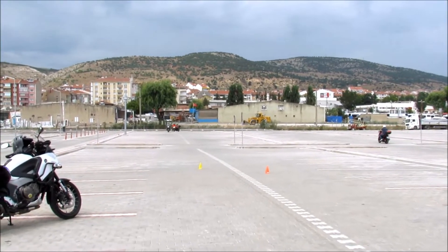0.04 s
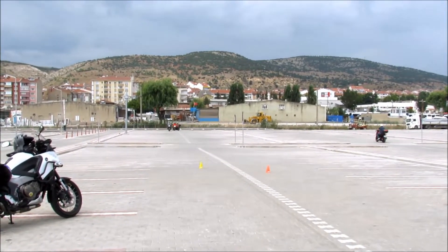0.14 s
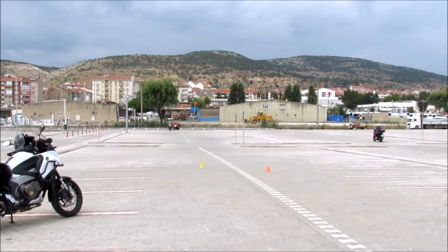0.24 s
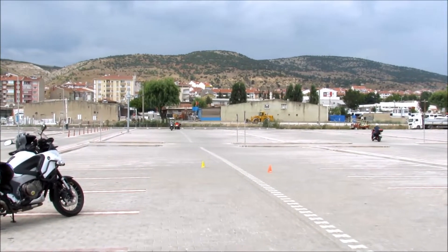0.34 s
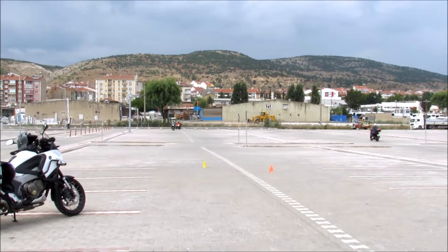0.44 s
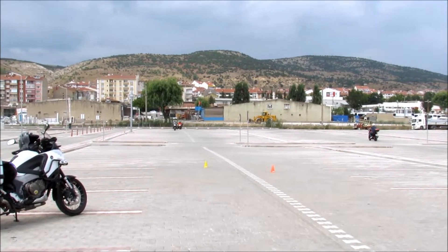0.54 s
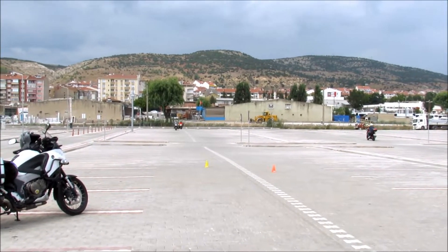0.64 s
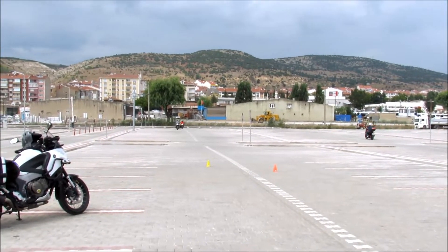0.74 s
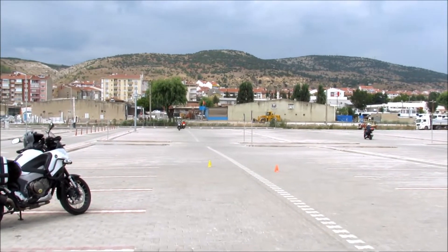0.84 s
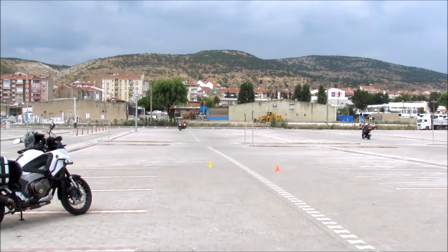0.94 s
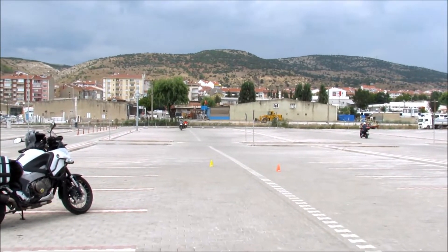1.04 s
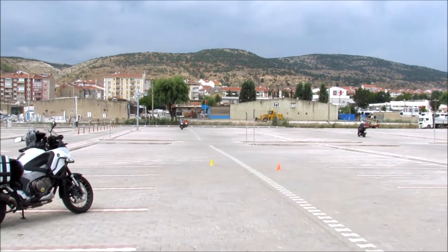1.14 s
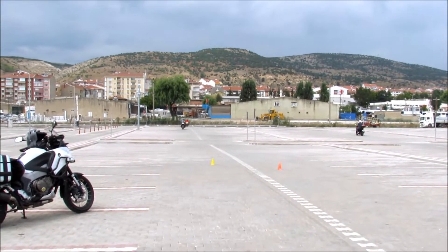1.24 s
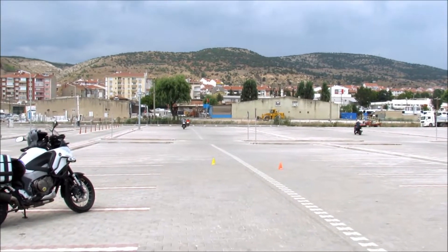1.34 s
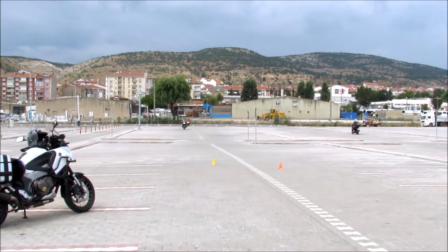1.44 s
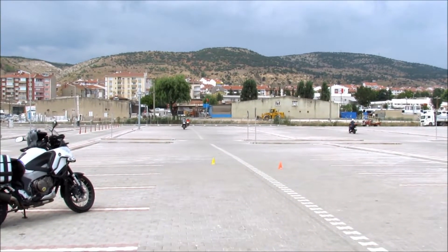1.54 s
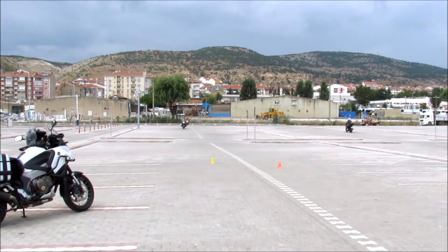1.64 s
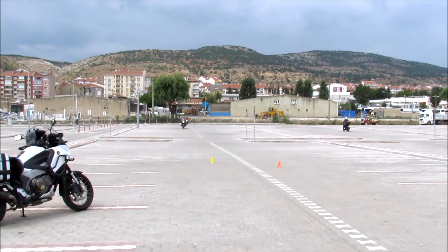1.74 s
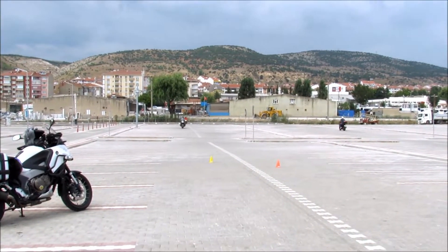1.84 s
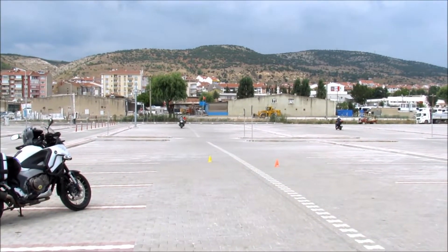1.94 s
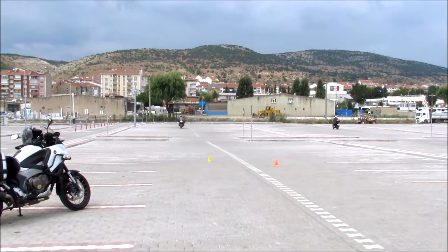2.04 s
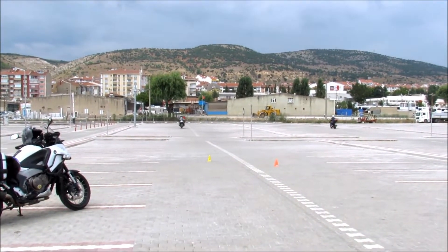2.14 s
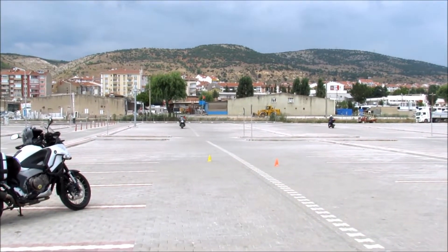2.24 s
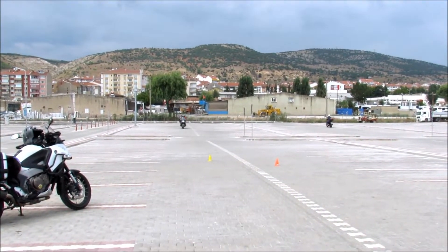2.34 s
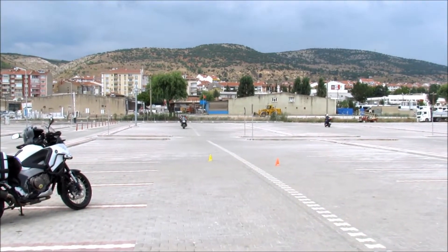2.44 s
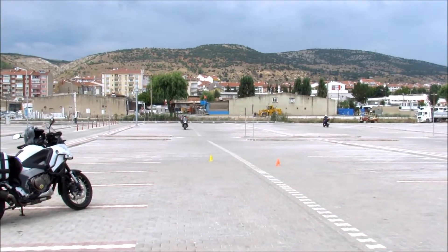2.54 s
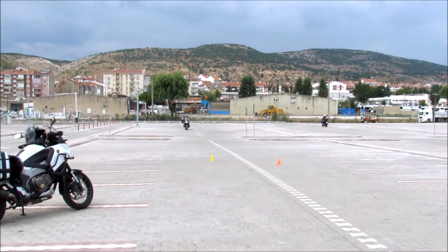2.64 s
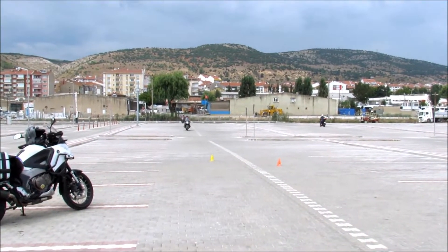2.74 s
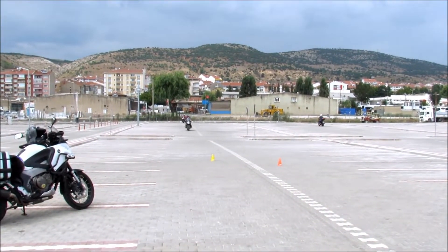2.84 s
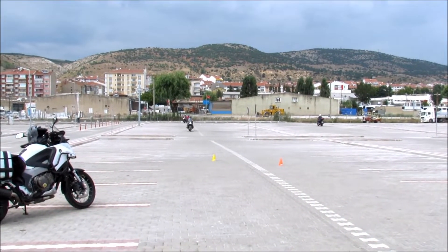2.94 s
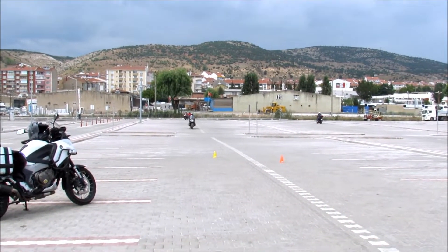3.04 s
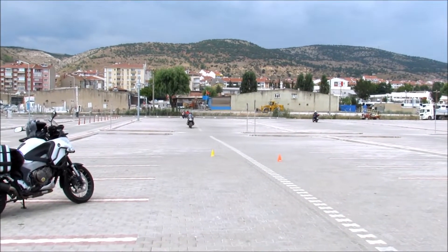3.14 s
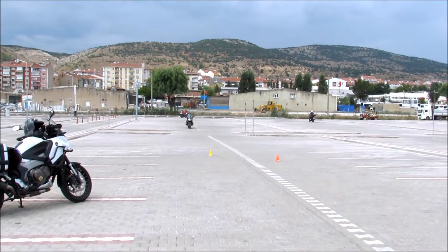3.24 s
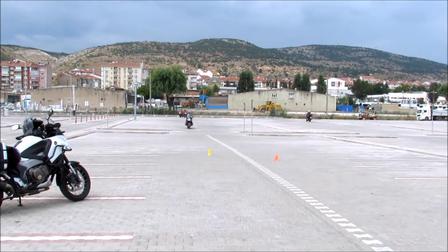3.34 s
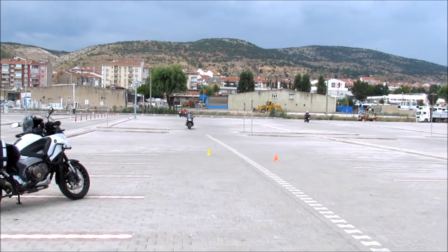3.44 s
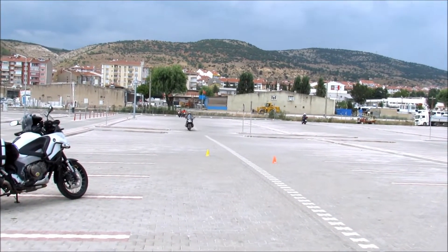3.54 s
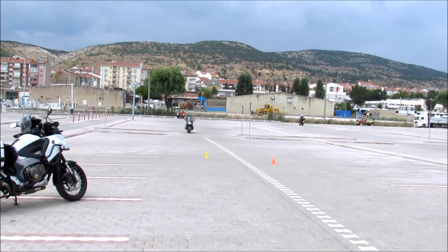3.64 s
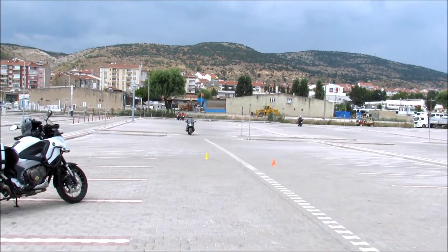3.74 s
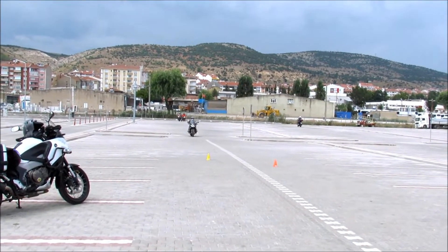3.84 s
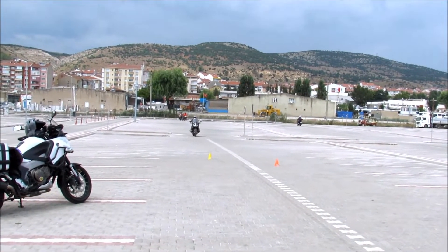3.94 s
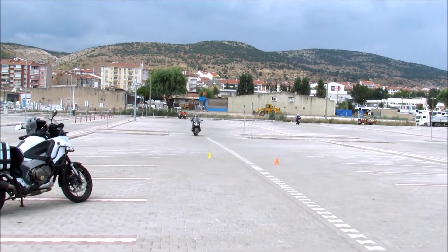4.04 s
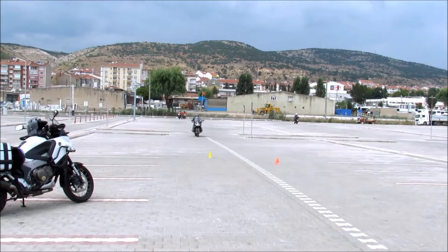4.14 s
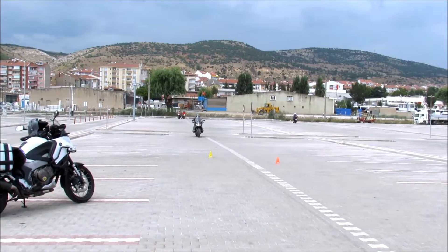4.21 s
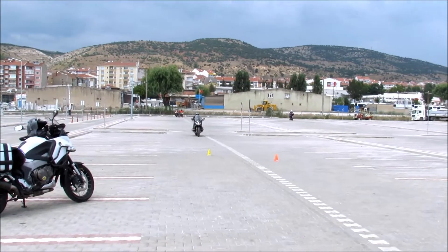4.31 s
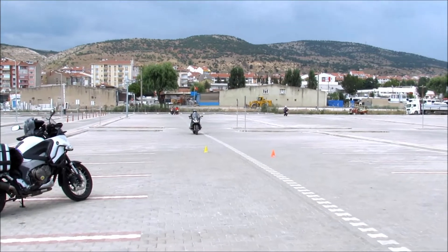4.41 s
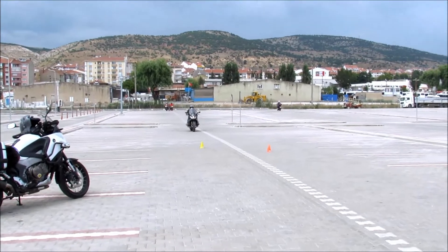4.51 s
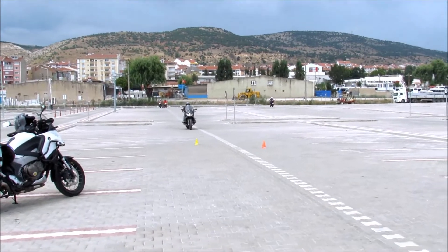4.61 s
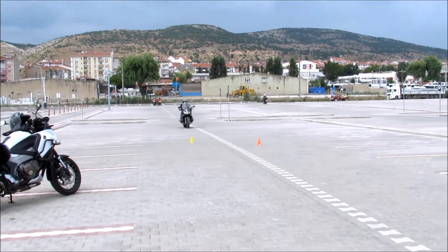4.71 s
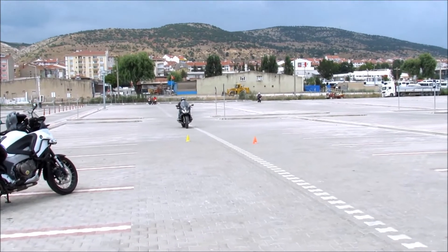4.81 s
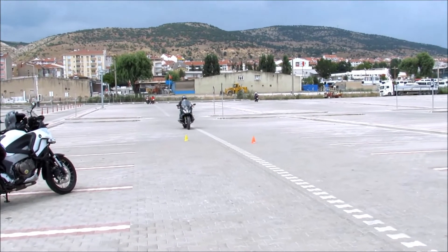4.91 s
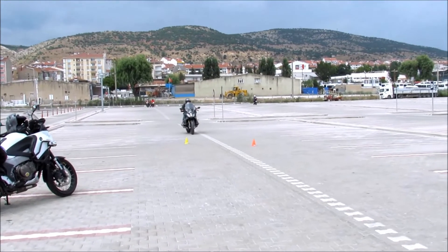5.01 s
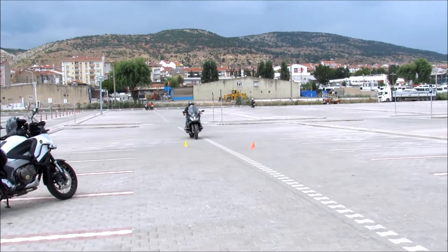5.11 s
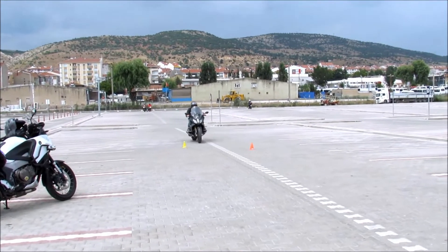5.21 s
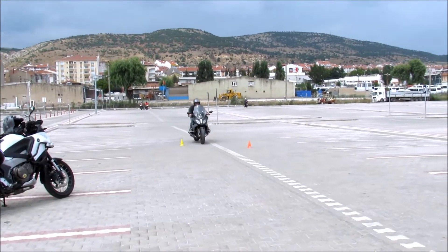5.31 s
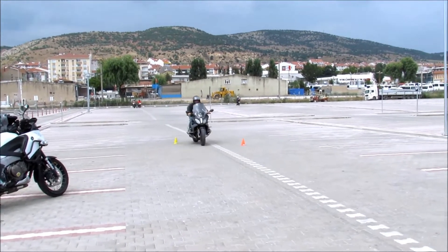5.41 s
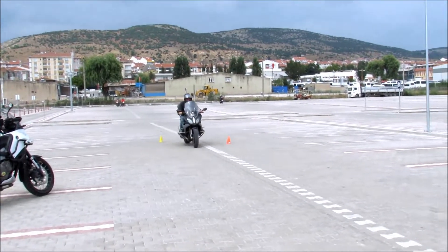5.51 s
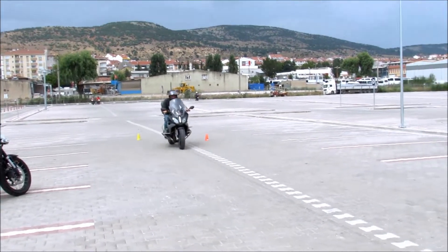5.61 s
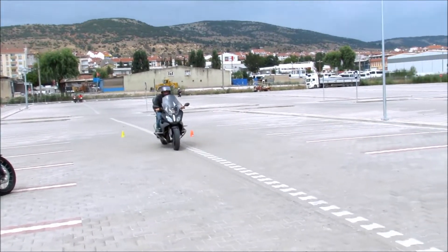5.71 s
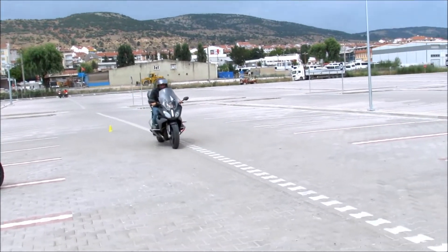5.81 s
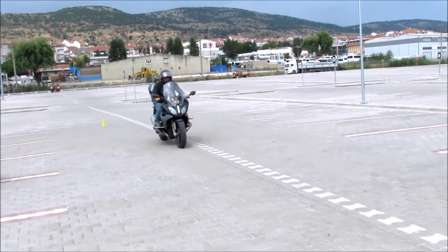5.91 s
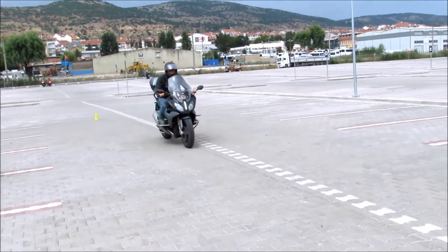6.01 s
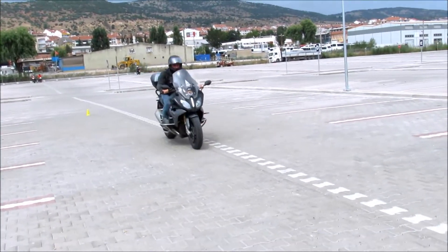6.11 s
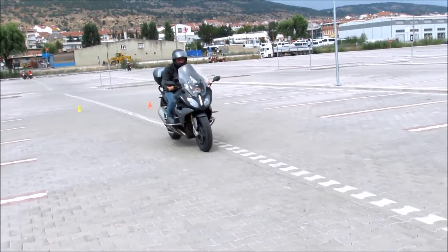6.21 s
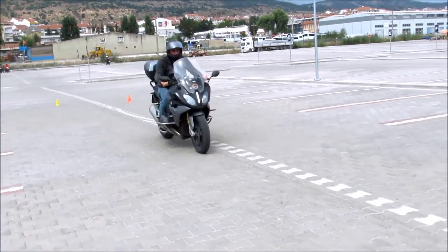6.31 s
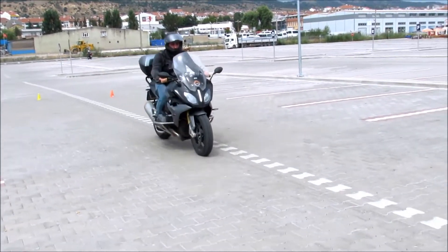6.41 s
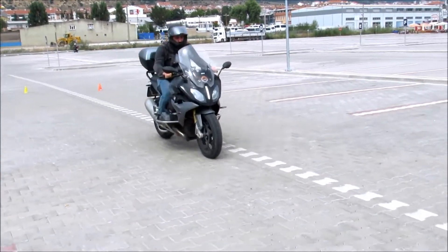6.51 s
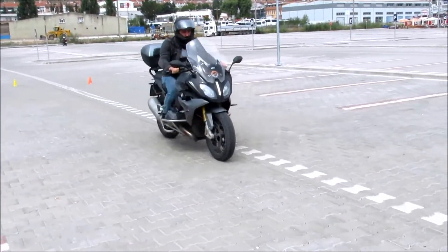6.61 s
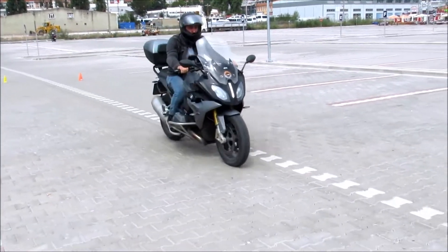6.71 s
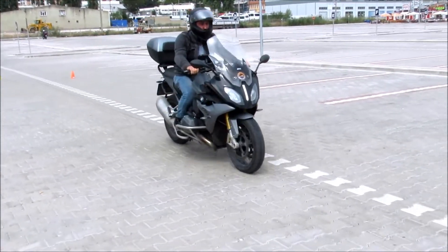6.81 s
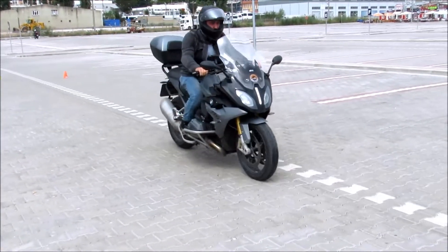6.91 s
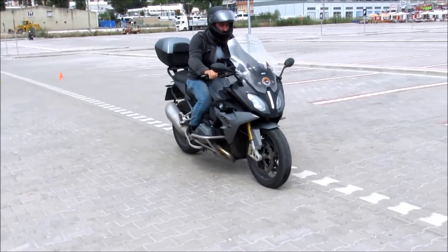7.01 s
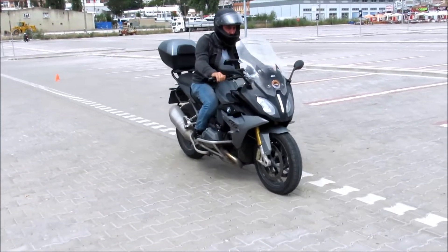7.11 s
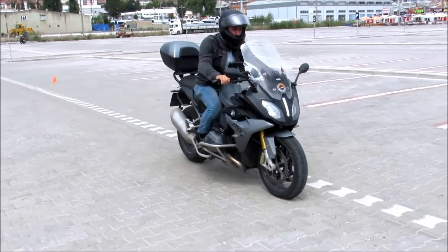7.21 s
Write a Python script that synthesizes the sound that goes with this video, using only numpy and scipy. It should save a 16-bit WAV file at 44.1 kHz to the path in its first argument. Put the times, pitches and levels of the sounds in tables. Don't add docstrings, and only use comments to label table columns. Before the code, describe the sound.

Outdoors on an open paved lot, stereo microphones sit close to an uneven-firing twin motorcycle. From 0 s it idles slowly with a low pipe hum, quickening around 0.8 s, over dull far traffic. Wind gusts rumble and flutter across both sides, strong at the start and around 1 s. A very faint thin squeal sounds far off at 2.0-2.3 s. Near 2.5 s the revs sag, then the throttle snaps open and the throb becomes louder and barkier, continuing to the end. From about 3 s a second, even-firing bike emerges, its tyre hiss and thin gear whine growing to a peak near 5 s, then its revs fall. A stone ticks at 5.6 s; a hard wind thump hits at 5.9 s with flutter following. Gritty scuffs scatter from 5.7 s, with clustered brake chirps at 6.55 s and 6.98 s; both engines are still running at 7.3 s.

```python
import sys
import numpy as np
from scipy import signal
from scipy.fft import rfft, irfft, next_fast_len
from scipy.io import wavfile
from scipy.ndimage import uniform_filter1d, map_coordinates

SR = 44100
rng = np.random.default_rng(int(sys.argv[2]) if len(sys.argv) > 2 else 0)


def rack_gain(trim_db):
    fader = np.asarray(trim_db, float)
    return 10 ** (fader / 20)


def wav_record(signal):
    frames = np.transpose(np.atleast_2d(signal))
    bounded = np.clip(frames, -1, 1)
    quanta = np.round(bounded * 32767).astype(np.int16)
    wavfile.write(sys.argv[1], SR, quanta)


N = 320151
T = np.arange(N) / SR


def evened(x):
    return x / np.sqrt(np.mean(x ** 2) + 1e-20)


def running_rms(x):
    return np.sqrt(abs(uniform_filter1d(x ** 2, SR // 4)) + 1e-12)


def curves(rows):
    s, *columns = np.transpose(rows)
    return [np.interp(T, s, c) for c in columns]


def read(points, hz):
    f, value = np.transpose(points)
    return np.interp(np.log(hz + 1), np.log(f + 1), value)


def colour(x, *spectra):
    size = next_fast_len(N + SR)
    hz = np.fft.rfftfreq(size, 1 / SR)
    gain_db = sum(read(s, hz) for s in spectra)
    return irfft(rfft(x, size) * rack_gain(gain_db), size)[..., :N]


def band(low_hz, high_hz):
    rise = [(.75 * low_hz, -25), (low_hz, -3), (1.15 * low_hz, 0)]
    return rise + [(.87 * high_hz, 0), (high_hz, -3), (1.3 * high_hz, -25)]


def wander(hz):
    knots = rng.standard_normal(1000)
    t = T[::64]
    return evened(np.interp(T, t, map_coordinates(knots, [t * 2 * hz], order=3)))


def resonate(x, hz, width):
    turn = np.exp(2j * np.pi * np.cumsum(hz * np.ones(N)) / SR)
    r = np.exp(-np.pi * width / SR)
    return 2 * (turn * signal.lfilter([1 - r], [1, -r], x / turn)).real


def order_of(x, cycles, k):
    angle = 2 * np.pi * k * cycles
    turn = np.array([np.cos(angle), np.sin(angle)])
    slow = uniform_filter1d(uniform_filter1d(x * turn, SR // 10), SR // 14)
    return 2 * (turn[0] + 1j * turn[1]) * (slow[0] - 1j * slow[1])


def sides(mid, side):
    return np.array([mid + side, mid - side])


def town():
    # frequency in Hz, level in dB
    far_traffic = [(30, -23), (55, -13.5), (90, 1), (130, -6), (200, -41), (400, -90)]
    rumble = evened(colour(rng.standard_normal(N), far_traffic))
    return rack_gain(-33.5 + 2.4 * wander(3.8)) * rumble


def gusts():
    # arrival in seconds, hold in seconds, rumble level in dB, flutter over rumble in dB
    gust_rows = [(0.042, 0.039, -15.5, -6.5), (.5, 0.34, -18, -15.5), (1, 0.036, -12, -8.5),
                 (1.102, 0.44, -23.5, -14), (1.776, 0.19, -25.5, -25), (2.2, .2, -35, -30),
                 (2.503, 0.11, -21, -10), (2.7, .1, -31, -18), (2.998, 0.23, -28.5, -27),
                 (4.026, .08, -29, -22), (5.01, .11, -18.5, -18), (5.2, 0.16, -22.5, -21),
                 (5.6, .1, -22, -20), (5.798, 0.34, -18, -6), (6.266, 0.28, -19, -1),
                 (6.72, .12, -28.5, -10), (7.08, .2, -33, -21)]
    rise_db_per_s, fall_db_per_s = 110, 106
    calm_db, calm_flutter_db = -36, -57
    s, hold, db, over_db = np.transpose(gust_rows)[..., None]
    t = T[::256]
    db = db - rise_db_per_s * np.maximum(s - t, 0) - fall_db_per_s * np.maximum(t - s - hold, 0)
    rumble_db = np.maximum(db.max(0), calm_db)
    flutter_db = np.maximum((db + over_db).max(0), calm_flutter_db)
    return np.interp(T, t, rumble_db), np.interp(T, t, flutter_db - rumble_db)


def wind():
    # frequency in Hz, level in dB
    rumble_shape = [(10, -40), (20, -16), (45, -6), (80, 0), (150, -1), (200, -5), (280, -22), (400, -50),
                    (1000, -120)]
    # frequency in Hz, level in dB
    flutter_shape = [(60, -60), (120, -25), (200, 0), (262, -5), (454, -19), (577, -32), (684, -50),
                     (2000, -120)]
    # time in seconds, peak in dB, length in seconds, left relative to right
    thumps = [
        (1.55, -8.5, 0.0028, 0.1),
        (2.527, -5, 0.0012, -0.76),
        (3.918, -4, .0035, -1.4),
        (5.9325, 0.5, 0.0018, -3.5),
        (6.093, -17, 0.0037, -1.3),
    ]
    rumble_db, flutter_db = gusts()
    lumps_db = 3.5 * np.minimum(wander(12), 1.5) - 1
    rumble = evened(colour(rng.standard_normal((2, N)), rumble_shape))
    flutter = evened(colour(rng.standard_normal((2, N)), flutter_shape))
    flutter *= rack_gain(flutter_db + .7 * lumps_db - 1)
    mid, side = rack_gain(rumble_db + lumps_db) * (rumble + flutter)
    out = sides(rack_gain(-13) * mid, side)
    for s, db, length, left in thumps:
        u = np.clip((T - s) / length, -9, 9)
        thump = (1 - u ** 2) * np.exp(-.5 * u ** 2)
        out += rack_gain(db) * thump * [[left], [1]] / max(1, abs(left))
    return out


def squeal():
    # time in seconds, pitch in Hz, level in dB
    glide = [
        (2.0, 1088, -67),
        (2.036, 1205, -52),
        (2.19, 1210, -48),
        (2.198, 1140, -62),
        (2.256, 1280, -63),
        (2.3, 1220, -56),
    ]
    hz, level_db = curves(glide)
    turns = 2 * np.pi * np.cumsum(hz) / SR
    start, end = glide[0][0], glide[-1][0]
    gate = np.interp(T, [start, start + .03, end - .05, end], [0, 1, 1, 0])
    return rack_gain(level_db + 3) * gate * (np.sin(turns) + rack_gain(-8) * np.sin(2 * turns))


def scuffs():
    # time in seconds, level in dB, rise in seconds, fall in seconds, brightness in dB per octave
    scrapes = [(5.728, -44, .006, .01, -0.5), (5.772, -40, 0.0055, 0.012, -3.5),
               (6.09, -43, 0.011, 0.012, -3), (6.115, -44.5, 0.0029, 0.0049, 1),
               (6.148, -33.5, 0.00064, 0.0046, -5), (6.2, -41.5, 0.0015, 0.011, -4),
               (6.561, -32.5, 0.023, 0.017, -1.5), (6.598, -38, 0.011, 0.0036, -5),
               (6.692, -49, 0.0035, 0.0066, -4), (6.962, -37.5, 0.014, 0.044, -6.5),
               (7.0244, -31, 0.0008, 0.01, -7), (7.074, -47, 0.0046, 0.0028, 3),
               (7.095, -33, .004, 0.0036, -7.5)]
    out = np.zeros((2, N))
    for s, db, rise, fall, tilt_db in scrapes:
        shape = [(700, -18.0), (1100, -7), (2500, -2.5 + tilt_db),
                 (10000, -6.0 + 3 * tilt_db), (16000, -39 + 4 * tilt_db)]
        part = slice(int((s - .1) * SR), int((s + .16) * SR))
        u = T[part] - s
        grit = rng.standard_normal((2, len(u))) * [[1], [.25]]
        grit *= rack_gain(3 * rng.standard_normal(len(u)))
        hz = np.fft.rfftfreq(len(u), 1 / SR)
        grit = evened(irfft(rfft(grit) * rack_gain(read(shape, hz)), len(u)))
        out[:, part] += rack_gain(db) * sides(*grit) * np.exp(np.minimum(u / rise, -u / fall))
    return out


def stone():
    start_s, level_db, length_s = 5.5988, -29, .0007
    tick = evened(signal.lfilter([1], [1, -.25], rng.standard_normal(N)))
    return rack_gain(level_db) * tick * np.exp(-((T - start_s) / length_s) ** 2)


def brake():
    # time in seconds, peak in dB, pitch in Hz, length in seconds
    chirps = [
        (6.545, -13, 2404, 0.0039),
        (6.552, -25, 2400, 0.0033),
        (6.561, -19, 2530, .003),
        (6.565, -12, 2380, 0.0031),
        (6.57, -16, 2400, 0.0057),
        (6.578, -25, 2280, 0.0066),
        (6.977, -23, 2550, 0.0035),
        (6.982, -19.5, 2480, 0.0049),
    ]
    t, out = T[-SR:], np.zeros(N)
    for s, db, hz, length in chirps:
        bead = np.exp(-2 * ((t - s) / length) ** 2)
        out[-SR:] += rack_gain(db) * bead * np.sin(2 * np.pi * hz * t)
    return out * rack_gain([[-.6], [.6]]) 


def whine():
    # time in seconds, level in dB
    load = [
        (2.4, -79),
        (3, -84),
        (4, -69.5),
        (4.5, -63.5),
        (4.95, -59),
        (5.18, -69.5),
        (5.4, -75),
        (6.2, -73),
        (7.26, -78),
    ]
    # pitch in Hz, width in Hz, level in dB
    load_bands = [(1360, 500, 15), (2260, 78, -5), (3500, 200, 6), (6760, 340, 1.5), (6800, 270, 10),
                  (7700, 200, 6.5), (10100, 300, 2.5), (10900, 300, 3), (12300, 250, -2.5)]
    lines = np.zeros((2, N))
    for hz, width, db in load_bands:
        noise = rng.standard_normal((2, N)) + 4.5 * rng.standard_normal(N)
        lines += rack_gain(db) * evened(resonate(noise, hz, width))
    return rack_gain(curves(load)[0]) * lines * (T > load[0][0])


def hiss():
    # time in seconds, level in dB
    roll = [(0, -52), (.36, -53.5), (.77, -48.5), (1.15, -50), (1.98, -46), (2.2, -45), (2.75, -42.5),
            (3.3, -40.5), (3.8, -38.5), (4.2, -40.5), (4.4, -36.5), (5.12, -34.5), (5.45, -39.5),
            (5.76, -36), (6.14, -42), (6.45, -39.5), (6.83, -42), (7.15, -39.5)]
    # frequency in Hz, density in dB per Hz
    hiss_shape = [(260, -7), (450, -2.5), (546, -3.5), (692, -24), (803, -10), (1180, -7), (2010, -11),
                  (2230, -6.5), (2960, -13.5), (5130, -20.5), (6220, -22), (6800, -22.5), (8750, -24.5),
                  (12700, -27.5), (15600, -40.5)]
    # frequency in Hz, side minus mid in dB
    width = [(500, -11), (1000, -12.5), (2400, -21.5), (4400, -16.5), (8000, -6), (13000, -7)]
    # band level over the body in dB, extra dB per dB of roll, extra dB once the bike is close
    brighten = [
        (0, 0, 0.5),
        (-6, 0.034, 3),
        (-11, -0.1056, 3),
        (-20, 0.19, 5),
    ]
    edges = [100, 1900, 4500, 10000, 30000]
    close = np.interp(T, [5.1, 7.2], [0, 1])
    roll_db, flicker_db = curves(roll)[0], 0.95 * wander(26)
    out = np.zeros((2, N))
    for low, high, (over_db, lean, close_db) in zip(edges, edges[1:], brighten):
        level_db = roll_db + over_db + lean * (roll_db + 44) + close_db * close
        level_db = level_db - 2.0 + flicker_db + .5 * wander(7.4)
        mid, side = rng.standard_normal((2, N))
        mid = colour(mid, hiss_shape, band(low, high))
        side = colour(side, hiss_shape, band(low, high), width)
        out += rack_gain(level_db) * sides(mid, side) / mid.std()
    return out


def rider():
    # time in seconds, firing rate in Hz, level in dB
    ride = [
        (2.9, 56.3, -23.5),
        (4.2, 64.3, -32),
        (4.95, 69.03, -25.5),
        (5.2, 62.94, -28),
        (5.3, 57.14, -21.5),
        (5.5, 45.6, -25.5),
        (5.75, 38.3, -32),
        (6.0, 40.97, -32),
        (7.26, 44.3, -27.5),
    ]
    # multiple of the firing rate, level in dB
    rider_orders = [(1, -4), (1.5, -18), (2, 0), (2.5, -16), (3, -13), (4, -20)]
    # frequency in Hz, level in dB
    low_cut = [(20, -40), (40, -14), (60, -3), (75, 0)]
    hz, level_db = curves(ride)
    turns = np.cumsum(hz * (1 + 0.0079 * wander(14.5))) / SR
    orders = np.zeros(N)
    for k, db in rider_orders:
        orders += rack_gain(db + 2.2 * wander(4.8)) * np.cos(2 * np.pi * (k * turns + rng.random()))
    fade_in = np.clip((T - ride[0][0]) / 0.4, 0, 1)
    return rack_gain(level_db + 5.5) * colour(orders, low_cut) * fade_in


def pipe_hum():
    # time in seconds, pitch in Hz, level in dB
    hum = [
        (0, 160.4, -29.5),
        (.09, 160.1, -27),
        (.23, 151.8, -37),
        (.27, 115.7, -31),
        (.4, 113.3, -29.5),
        (.62, 110, -33.5),
        (.76, 116.4, -29),
        (.9, 121.9, -66),
    ]
    hz, level_db = curves(hum)
    return np.sqrt(2) * rack_gain(level_db) * np.sin(2 * np.pi * np.cumsum(hz) / SR)


def blows(speed, start):
    # delay in seconds, strength
    pipes = [
        [(0, 1), (.006, .5), (.0121, .55), (.02, .25), (.0245, .15), (.033, .1), (.041, .15)],
        [(0, 1.1), (.0072, .6), (.0125, -.15), (.02, .4), (.027, -.15), (.033, .1), (.042, .08)],
    ]
    # time in seconds, blow strength in dB
    snap = [
        (2.48, 0),
        (2.5, -5),
        (2.58, -4),
        (2.595, 5),
        (2.62, 0),
        (2.69, 2),
        (2.74, 2),
        (2.77, 0),
    ]
    second_firing, jitter = .44, .006
    uneven_db, blow_s, suck_s, suck = 1.2, .001, .0025, 1.05

    def blow(u):
        push = np.exp(-.5 * (u / blow_s) ** 2)
        return push - suck * np.exp(-.5 * ((u - suck_s) / (1.3 * blow_s)) ** 2)

    cycles = start + np.cumsum(speed) / SR
    snap_db = curves(snap)[0]
    t = np.arange(-400, 2400) / SR
    out, fired = np.zeros(N), np.zeros(N)
    for late, pipe in zip((0, second_firing), pipes):
        count = np.floor(cycles - late + jitter * wander(25))
        fire = np.diff(count, prepend=np.floor(start - late))
        fire = fire * rack_gain(uneven_db * rng.standard_normal(N) + snap_db)
        rattle = sum(g * blow(t - s) for s, g in pipe)
        out += signal.oaconvolve(fire, rattle)[400:N + 400]
        fired += fire
    return out, fired, cycles


def gas_rush(fired):
    puff = signal.lfilter([1], [1, -np.exp(-1 / (0.015 * SR))], fired) * rng.standard_normal(N)
    shape = [(150, -50), (300, 4.5), (550, -14), (700, -40.5), (900, -33), (2000, -57), (6000, -88)]
    return evened(colour(puff, shape))


def twin():
    # time in seconds, engine cycles per second
    revs = [(0, 9.409), (0.56, 9.391), (0.85, 13.273), (1.73, 13.952), (1.87, 13.772), (2.05, 15.861),
            (2.56, 10.524), (2.68, 16.526), (2.87, 18.588), (3.09, 18.237), (3.26, 16.224), (3.39, 15.378),
            (3.89, 16.123), (4.64, 15.699), (4.98, 16.328), (5.38, 16.012), (6.04, 16.903), (7.26, 17.765)]
    # time in seconds, bark level in dB, boom of the pipe in dB
    throttle = [(0, -47, 3), (.3, -49, 3), (.6, -43.5, 3), (.85, -38.5, 1), (1.4, -38.5, 16.5),
                (2.0, -34.5, 11), (2.2, -39.5, 15), (2.5, -37, -4), (2.65, -27.7, 5.5), (3.0, -27.5, -3.5),
                (3.25, -28.5, 6.5), (3.6, -29, 10.5), (3.85, -29.5, 1), (4.6, -28, 10.5), (5.2, -29, -3),
                (5.8, -29, 7.5), (6.35, -31, -3), (7.26, -31, 8.5)]
    # frequency in Hz, level in dB
    exhaust = [(25, -38), (45, -26), (70, -1), (150, 5), (320, 1.5), (450, 3.5), (600, -12), (720, -32),
               (1000, -40), (3000, -90)]
    # order of the engine cycle, change in dB
    pipe_orders = [(3, -14), (4, 0), (6, 4), (7, -6), (17, -9), (20, 4)]
    # order of the engine cycle, level over the bark in dB, share of the boom
    standing = [
        (5, 0.5, 0.98),
        (8, 4.5, 0.22),
        (9, 9, -0.098),
    ]
    pipe_hz, under_pipe_db = 85, -30

    speed = curves(revs)[0]
    out, fired, cycles = blows(speed, start=.09)
    bark_db, boom_db = curves(throttle)
    shut = np.clip((T - 5.95) / 0.078 + 1, 0, 1)
    body_db = 6 + 0.068 * boom_db - 4.5 * shut
    level_db = bark_db + body_db

    out = colour(out, exhaust)
    out += sum((rack_gain(db) - 1) * order_of(out, cycles, k).real for k, db in pipe_orders)
    bark = colour(out, [(170, -40), (230, -12), (280, -4), (340, 0)])
    body = out - bark
    body /= running_rms(colour(out, [(150, -40), (175, 0), (255, 0), (280, -40)]))
    bark = rack_gain(1.03 - body_db) * bark / running_rms(bark)
    mid = rack_gain(level_db - 1.17) * (body + bark + rack_gain(-15) * gas_rush(fired))

    for k, db, share in standing:
        drone_db = bark_db + db + share * boom_db + 0.78 * wander(3)
        if share < .5:
            drone_db += under_pipe_db * np.maximum(np.log2(pipe_hz / (k * speed)), 0)
        drone = order_of(mid, cycles, k)
        gain = np.sqrt(2) * rack_gain(drone_db) / (abs(drone) + .03 * rack_gain(level_db))
        mid += (drone * (gain - 1)).real
    mid += pipe_hum()
    side = np.roll(colour(mid, [(60, -7.5), (300, -3.0)]), -60)
    return sides(mid, rack_gain(-14.5) * side)


def scene():
    surroundings = town() + wind() + squeal()
    arriving = scuffs() + stone() + brake() + whine() + hiss() + rider()
    return (surroundings + arriving + twin()) * np.minimum(T / .004, 1)


def low_pass(x):
    return signal.sosfilt(signal.butter(12, 16510, fs=SR, output="sos"), x)


def record(dry):
    loud = 1.3 * np.tanh(dry / 1.3)
    limited = signal.oaconvolve(loud, signal.firwin(511, 15800, fs=SR)[None], "same")
    return low_pass(limited)


dry = scene()
out = record(dry)
wav_record(out)
```